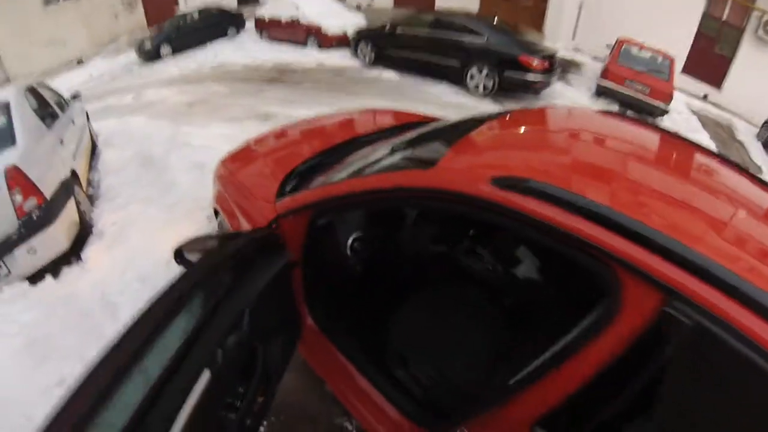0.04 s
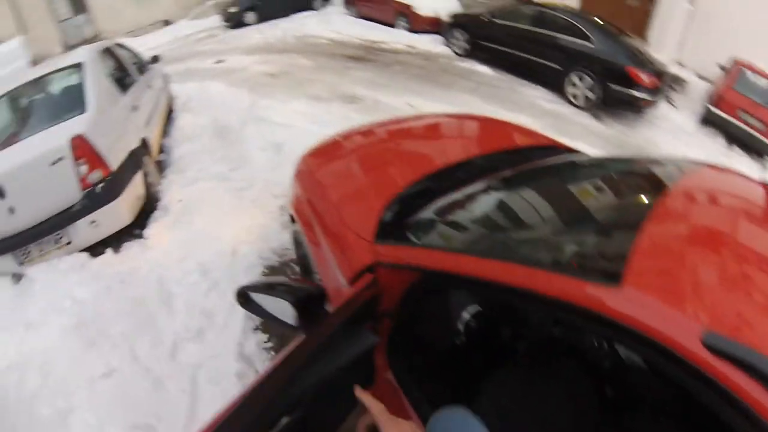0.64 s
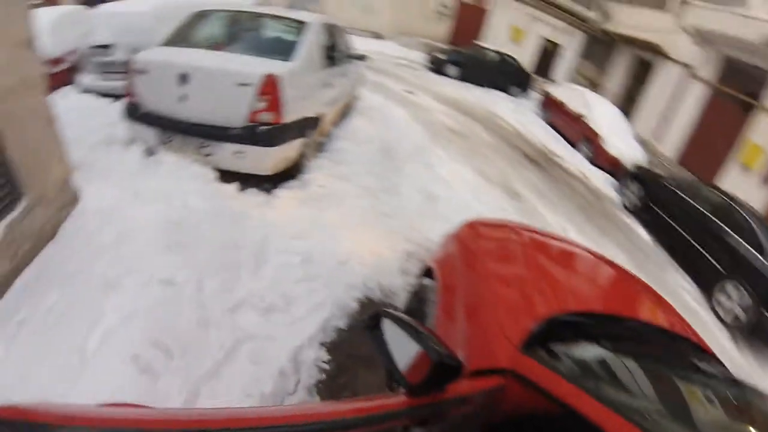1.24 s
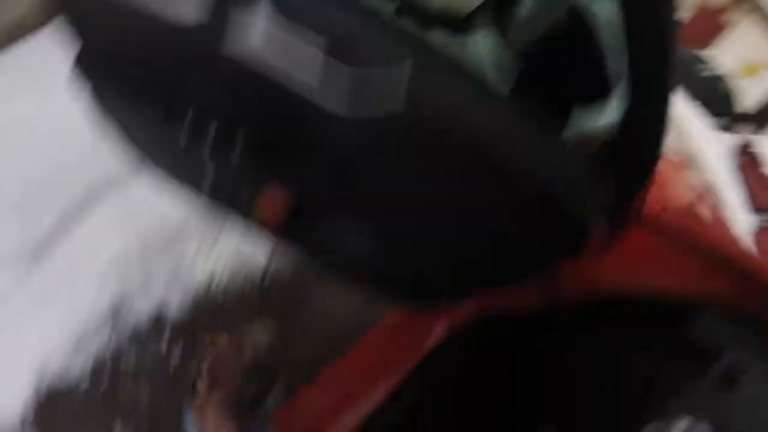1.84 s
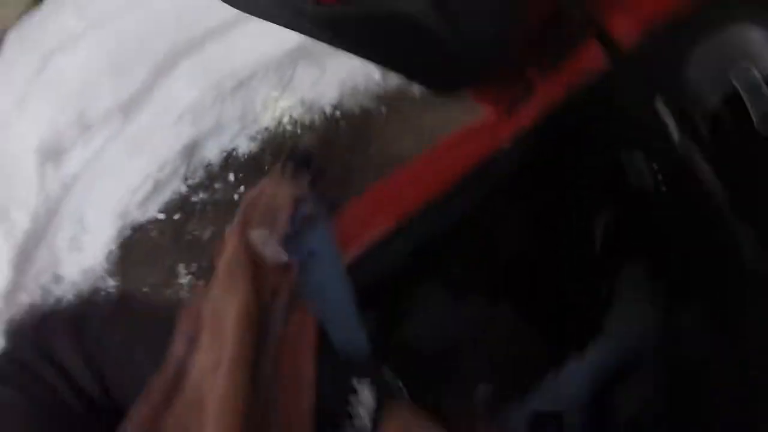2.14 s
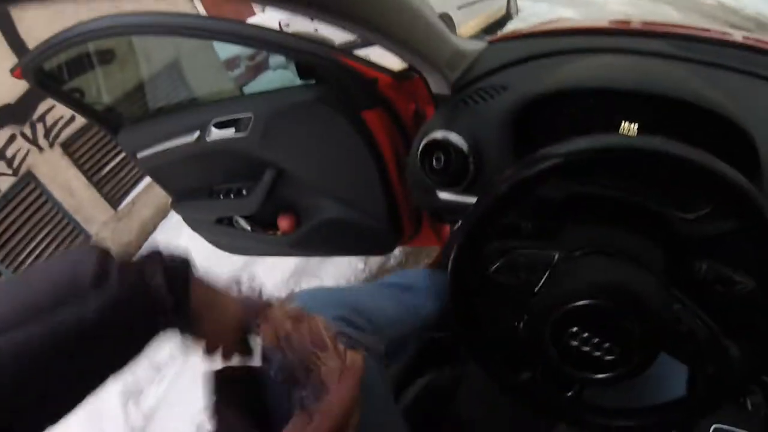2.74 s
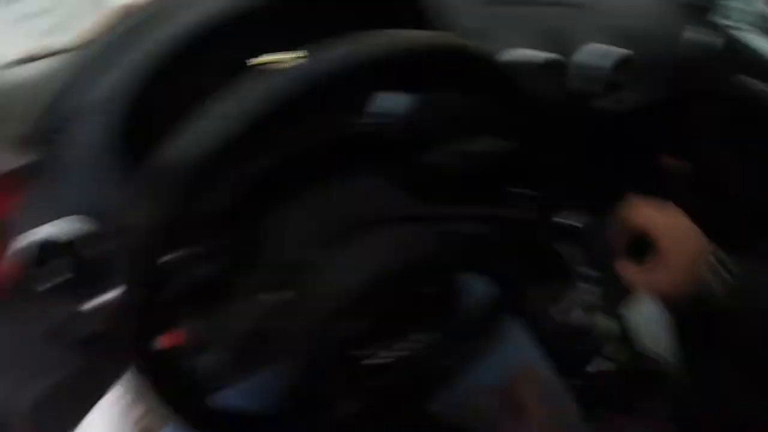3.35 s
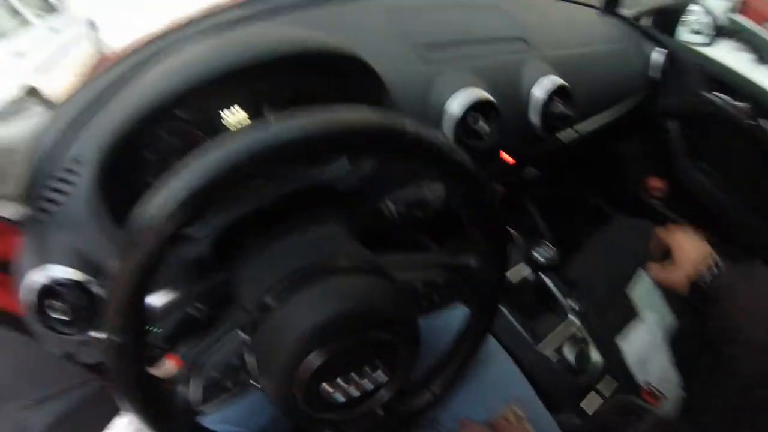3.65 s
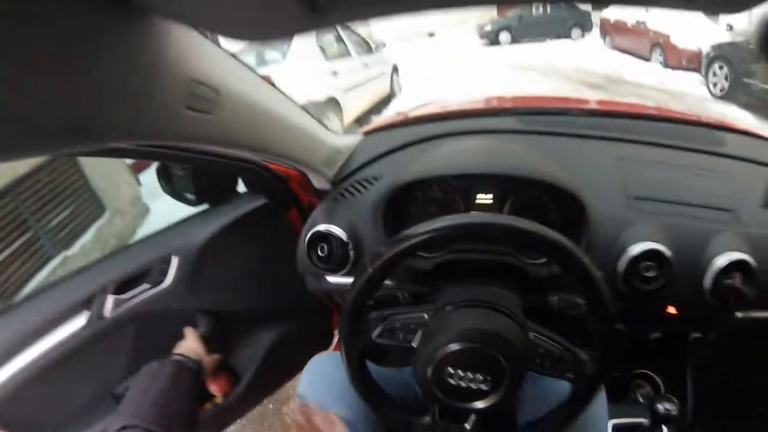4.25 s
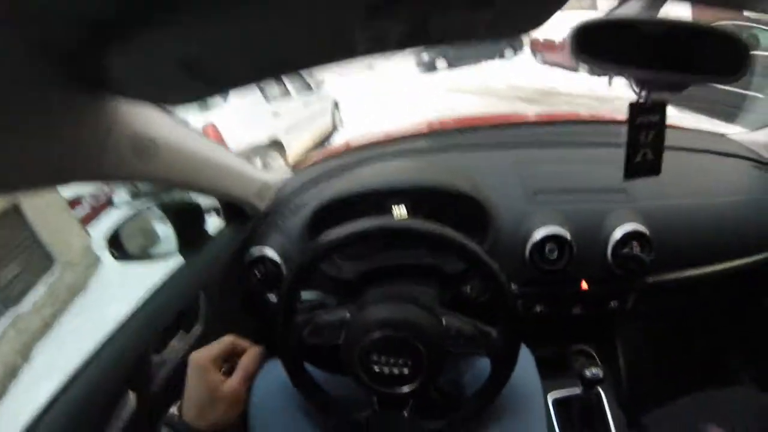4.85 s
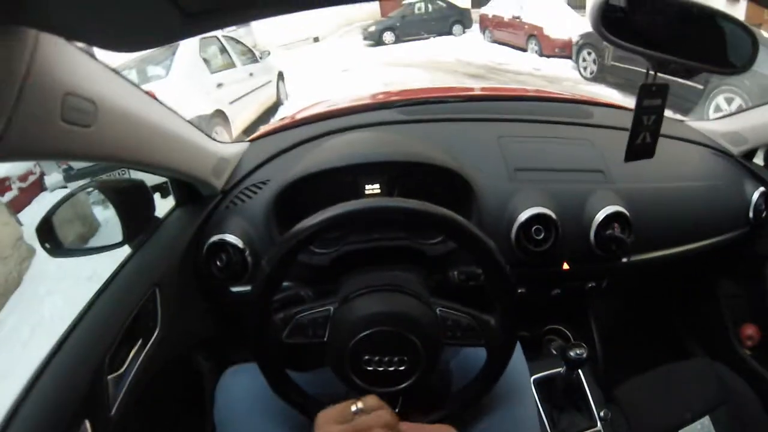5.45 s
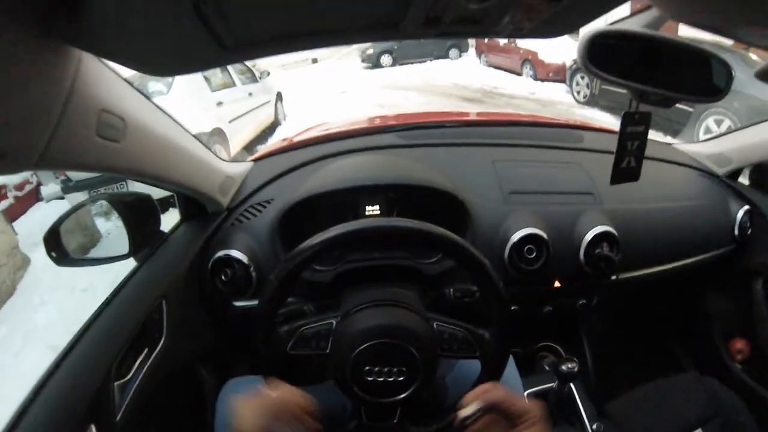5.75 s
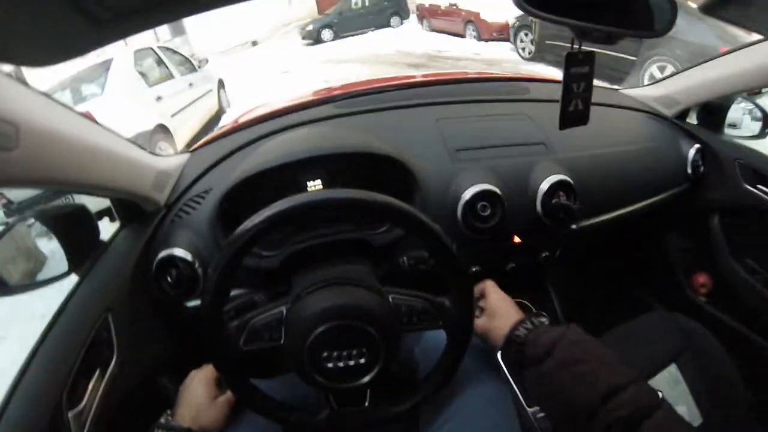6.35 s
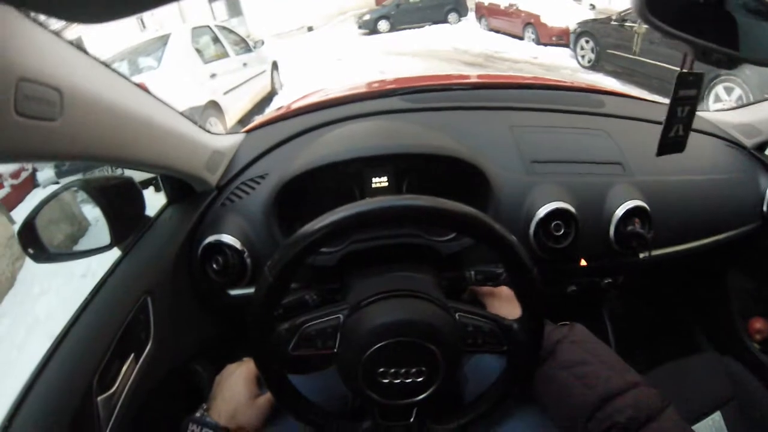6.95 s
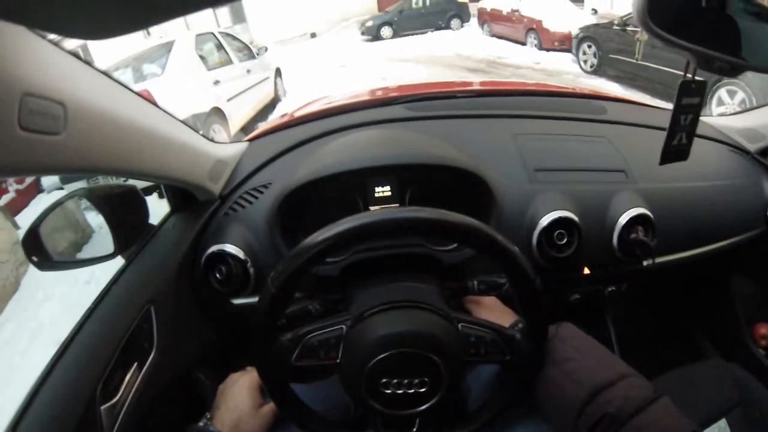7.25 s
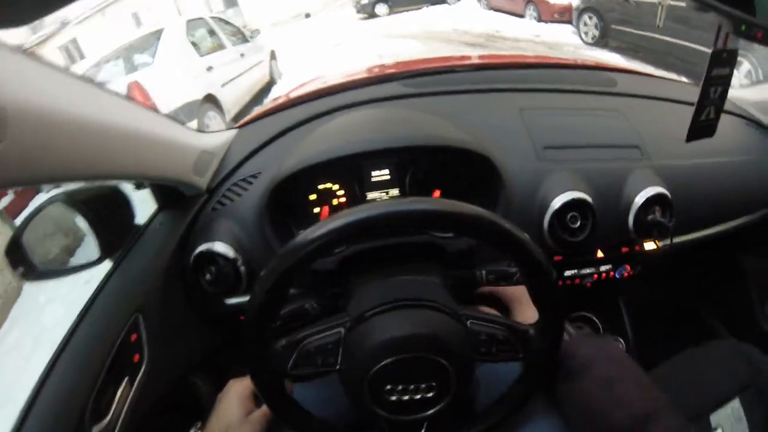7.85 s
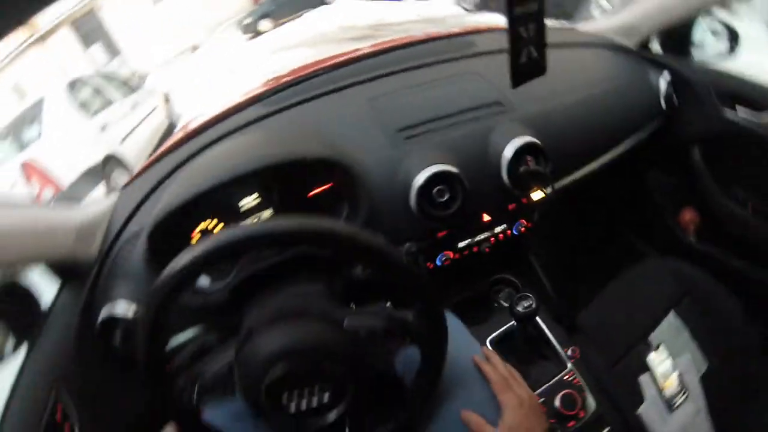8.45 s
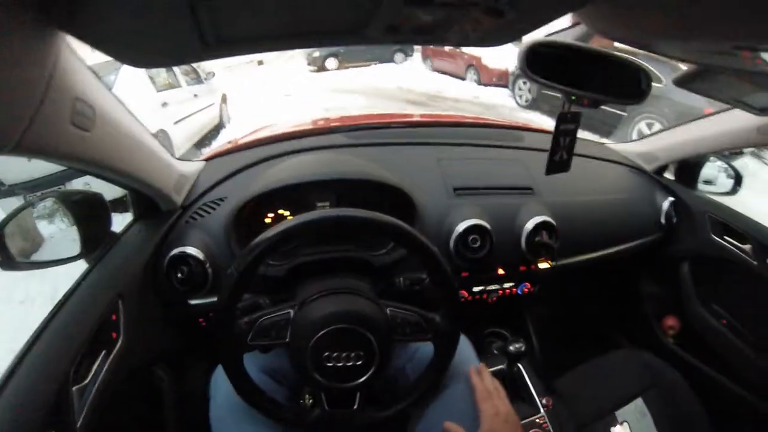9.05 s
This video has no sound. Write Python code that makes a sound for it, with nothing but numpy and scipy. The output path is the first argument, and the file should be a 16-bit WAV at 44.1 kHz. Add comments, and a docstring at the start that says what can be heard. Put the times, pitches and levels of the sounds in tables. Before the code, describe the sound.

A jacket rustles as someone climbs into a car, the door thumps shut, and a key clicks over low air rumble.

```python
"""Air rumbles on a head-worn microphone over faint hiss and the drone of a far machine in the street.
Close by, a driver in a padded jacket climbs into a parked car: cloth drags over the seat, ribbed folds
swish and squeak against each other, and small hard parts click. The door is pulled shut, its latch
snapping over the boom of panel and trapped air, and the drone is gone. In the small padded cabin
the key clicks into the ignition and turns through two notches."""
import sys
import numpy as np
from scipy import signal
from scipy.fft import rfft, irfft, next_fast_len
from scipy.io import wavfile
from scipy.ndimage import uniform_filter1d

SR = 44100
rng = np.random.default_rng(int(sys.argv[2]) if len(sys.argv) > 2 else 0)


def wav_out(sig):
    """Save sig, one row per channel (or a flat mono array), as 16-bit PCM at SR to the path in sys.argv[1]."""
    wavfile.write(sys.argv[1], SR, np.round(np.clip(np.atleast_2d(sig).T, -1, 1) * 32767).astype(np.int16))


N = 401751
TIME = np.arange(N) / SR
BAND_LIMIT_HZ = 15300


def amp(db):
    """Decibels to gain."""
    return 10 ** (np.asarray(db) / 20)


def unit_rms(x):
    """Scales to an rms of one."""
    return x / np.sqrt(np.mean(x ** 2) + 1e-20)


def at_hz(points, hz):
    """Reads a spectrum along a logarithmic frequency axis."""
    f, value = np.transpose(points)
    return np.interp(np.log(hz + 1), np.log(f + 1), value)


def fader(curve):
    """Turns rows of seconds and dB into a gain for every sample."""
    return amp(np.interp(TIME, *np.transpose(curve)))


def add(mix, start_s, sound):
    """Mixes a sound in at a given time."""
    part = mix[round(start_s * SR):][:len(sound)]
    part += sound[:len(part)]


def noise(shape, size=N):
    """Noise of rms one whose spectrum is a function of frequency."""
    length = next_fast_len(size)
    hz = np.fft.rfftfreq(length, 1 / SR)
    spectrum = rfft(rng.standard_normal(length)) * shape(hz)
    return unit_rms(irfft(spectrum, length)[:size])


def coloured(points):
    """Noise with a tabled spectrum."""
    return noise(lambda hz: amp(at_hz(points, hz)))


def wobble(rate_hz, size=N):
    """Random drift up to a given rate."""
    return noise(lambda hz: 1 / (1 + (hz / rate_hz) ** 4), size)


def impact(db, centre_hz, t60, octaves, damping, rise_s, top_hz):
    """A blow rings a dense cluster of modes around its centre; the high ones die first."""
    def hump(f):
        return 1 / (1 + (np.log2((f + 1) / centre_hz) / octaves) ** 2) / np.sqrt(1 + (f / top_hz) ** 5)

    t = np.arange(SR // 4) / SR
    hz = np.fft.rfftfreq(len(t), 1 / SR)
    cluster = rfft(noise(hump, len(t)))
    band_hz = np.geomspace(125, 16000, num=8)[:, None]
    shares = np.maximum(1 - abs(np.log2((hz + 1) / band_hz)), 0)
    band_t60 = t60 * (centre_hz / band_hz) ** damping
    bands = irfft(cluster * shares, len(t)) * amp(-60 * t / band_t60)
    return amp(db) * bands.sum(0) * (1 - np.exp(-t / rise_s))


def ring(modes, rise_s):
    """Dying modes, neighbours swinging in opposite directions; a soft contact swells slowly."""
    t = np.arange(SR) / SR
    swing = sum((-1) ** k * amp(db - 60 * t / t60) * np.sin(2 * np.pi * hz * t)
                for k, (hz, db, t60) in enumerate(modes))
    return swing * (1 - np.exp(-t / rise_s))


# Air right on the microphone. Each row: time in seconds, level in dB between 40 and 120 Hz.
AIR_LEVEL = [(0, -60), (.11, -57.5), (.18, -46), (.43, -52.5), (.64, -58), (1.07, -56.5), (1.15, -43),
             (1.5, -53), (1.72, -47), (2.13, -43.5), (2.24, -51), (3.02, -56), (3.76, -52), (4.55, -58),
             (4.8, -54.5), (5.1, -62), (5.6, -60), (6.0, -62.5), (7.3, -58.5), (7.65, -62.5), (7.88, -56.5),
             (8.37, -51), (8.6, -58), (9.11, -62.5)]
# Its eddies, before the treble rolls off. Each row: frequency in Hz, relative level in dB.
EDDY_SPECTRUM = [(5.9, -38), (10, 3), (22, -0.5), (34, -1.5), (58, -12.5), (102, -34.5), (300, -32),
                 (390, -64), (660, -120)]
def air_rumble(top_hz=150, gust_db=1.25, gust_hz=7):
    """Slow eddies push on the microphone, following the movement of the head."""
    eddies = noise(lambda hz: amp(at_hz(EDDY_SPECTRUM, hz)) / (1 + (hz / top_hz) ** 4))
    bass = signal.sosfiltfilt(signal.butter(4, [40, 120], "bandpass", fs=SR, output="sos"), eddies)
    bass_rms = np.sqrt(uniform_filter1d(bass ** 2, size=7000))
    return amp(gust_db * wobble(gust_hz)) * fader(AIR_LEVEL) * eddies / bass_rms


# The hiss behind everything. Each row: frequency in Hz, relative level in dB.
HISS_SPECTRUM = [(60, 7), (150, 3), (300, -3), (550, -6.5), (900, -9.5), (1600, -13), (2400, -14),
                 (3200, -10), (4400, -16), (6800, -16), (10300, -19), (11100, -15), (11800, -19),
                 (15000, -21.5)]
# Its stereo image. Each row: frequency in Hz, likeness of left and right from 0 to 1.
HISS_LIKENESS = [(60, 1.0), (150, 1.0), (380, 0.98), (940, 0.91), (2360, 0.91), (5920, 0.62), (14800, 0.69)]
def hiss(mid_db=-64.5):
    """Steady hiss, centred in the bass and parting between the ears in the treble."""
    likeness = np.clip(at_hz(HISS_LIKENESS, np.fft.rfftfreq(N, 1 / SR)), 0, 1)
    width = np.sqrt((1 - likeness) / (1 + likeness))
    side = irfft(rfft(coloured(HISS_SPECTRUM)) * width, N)
    return amp(mid_db) * (coloured(HISS_SPECTRUM) + np.array([side, -side]))


# A machine far off in the street. Each row: time in seconds, level in dB.
DRONE_LEVEL = [(0, -76.5), (1.2, -77.5), (2.2, -77), (2.9, -80), (4.7, -86), (4.9, -100)]
def street_drone(centre_hz=1590, half_width_hz=75):
    """A machine drones in one narrow band until the door shuts it out."""
    return fader(DRONE_LEVEL) * noise(lambda hz: 1 / (1 + ((hz - centre_hz) / half_width_hz) ** 2))


# The body shifts on the seat, below the microphone. Each row: time in seconds, relative level in dB.
RUSTLE_LEVEL = [(0, -70), (1.05, -72), (1.15, -69), (1.7, -68.5), (2.0, -66.5), (2.7, -67), (2.9, -69.5),
                (3.35, -66.5), (3.7, -73), (5.7, -71.5), (5.88, -67), (6.1, -73.5), (7.95, -73.5),
                (8.2, -65), (8.4, -69.5), (9.11, -72.5)]
# The colour of that rustle. Each row: frequency in Hz, relative level in dB.
RUSTLE_SPECTRUM = [(100, -15), (300, 0), (800, 0.5), (1500, -4.5), (2500, -5), (4000, -11), (7000, -16),
                   (15000, -25)]
def seat_rustle(gain_db=-3, clump_db=2, grain_db=2):
    """Cloth drags over upholstery in clumps of tiny catches."""
    catches = amp(gain_db + clump_db * wobble(19) + grain_db * wobble(400))
    return catches * fader(RUSTLE_LEVEL) * coloured(RUSTLE_SPECTRUM)


# The jacket, close under the microphone. Each row: start in seconds, length in seconds, relative level
# in dB, swell in dB, pitch midway in Hz, glide in octaves, sag in octaves, roughness from 0 to 1,
# brightness in dB per octave.
JACKET_STROKES = [ (1.168, 0.031, -59.5, 0, 2090, 0, 0, .85, 0.5),
                  (1.315, 0.14, -60, -3, 2347, -0.25, 0.15, 0.7, -3),
                  (1.445, .13, -59.5, -1, 2263, -0.12, 0.029, 0.96, 1.5),
                  (1.474, 0.03, -59, 0, 2270, .15, -0.04, 0.32, 2),
                  (1.563, 0.059, -53, 8, 1554, -0.53, 0.14, 0.79, 1.5),
                  (1.759, .05, -53, 16, 1380, 0.83, 0.027, 0.44, 4.5),
                  (1.785, 0.047, -47, 7, 2460, 0.049, 0.025, 0.47, -2),
                  (2.559, 0.024, -59.5, -7, 2060, -.25, 0, 0.27, -15),
                  (2.578, 0.087, -66, -7, 1235, 0.22, 0, 0.4, -20),
                  (2.807, 0.043, -61.5, -7, 1538, 0.073, 0, 0.82, 0),
                  (3.192, 0.027, -47.5, -7, 1830, -.1, -0.048, 0.45, -13),
                  (3.218, 0.055, -60, -7, 1950, 0, -0.0072, 0.57, -14),
                  (3.271, 0.097, -57, 11, 1840, .2, 0, 0.7, -11),
                  (3.387, 0.025, -59.5, 2, 2000, 0.074, -0.033, 0.65, -4),
                  (3.638, 0.059, -55, 7, 1733, 0.33, 0.37, 0.71, -5),
                  (4.027, 0.077, -50.5, 6.5, 1680, 0.017, 0.041, 0.7, -8),
                  (4.125, 0.041, -48.5, 2.5, 1620, 0.34, 0, 0.58, -3.5),
                  (4.156, 0.029, -44.5, -3, 1534, .3, 0.08, 0.24, 0),
                  (4.181, 0.042, -46.5, -1, 1680, .15, 0.23, 0.25, -2),
                  (4.213, 0.033, -48.5, -7, 2496, .4, 0.17, 0.15, -3),
                  (4.236, 0.047, -62, 2, 5030, .1, 0.034, 0.36, -1),
                  (4.269, .032, -59, 4, 5900, -.1, -0.36, 0.06, -6),
                  (4.295, .05, -53, -9, 1760, -0.92, 0.32, 0.38, 3.5),
                  (4.314, .046, -53, 4.5, 2400, 0.34, .15, 0.5, -4),
                  (5.119, 0.072, -67, -2, 2000, 0, 0.1, .95, -11),
                  (7.949, .038, -60.5, 4, 2020, -0.026, -0.18, .68, -2),
                  (7.988, .052, -54, 10, 2000, -.65, .25, .3, 1.5),
                  (8.034, 0.3, -65, -6, 1995, 0.056, 0, 0.97, -4),
                  (8.855, 0.041, -62.5, 4, 2040, 0.75, 0.081, 0.3, 3),
                  (8.933, .052, -55.5, 2, 1947, .15, .65, 0.48, 0.5)]
# The swish of its cloth. Each row: frequency in Hz, relative level in dB.
SWISH_SPECTRUM = [(200, -21.5), (900, -4.5), (1400, -4.5), (2400, -7), (4000, -6.5), (5600, -6.5),
                  (7200, -12), (11500, -21.5), (15000, -25)]
def jacket_stroke(length, db, swell_db, mid_hz, glide, sag, rough, brightness_db):
    """Ribs tick past each other at a pitch set by sliding speed; loose folds smear it into a swish."""
    grip_s, release_s, gain_db, press_db_per_octave = 0.009, 0.012, -4, 18
    waver_octaves, waver_hz, jitter = 0.061, 79.7, 0.115
    overtone_db_per_octave, second_ratio, second_db, catch_db = -8, 1.37, -2, 2
    t = np.arange(0, length, 1 / SR)
    size = len(t)
    along = t / length - 0.5
    slack = sag * (2 * along) ** 2  # folds pressed harder squeak lower and louder
    hz = mid_hz * 2 ** (glide * along + slack + waver_octaves * wobble(waver_hz, size))
    contact = np.minimum(t / grip_s, 1) * np.minimum((length - t) / release_s, 1)
    envelope = contact * amp(db + gain_db + swell_db * along - press_db_per_octave * slack)

    def fold(rib_hz):
        turns = np.cumsum(rib_hz * (1 + jitter * rough * wobble(575, size))) / SR
        tilt = overtone_db_per_octave + brightness_db
        harmonics = (amp(tilt * np.log2(k)) * (k * rib_hz < BAND_LIMIT_HZ) * np.sin(2 * np.pi * k * turns)
                     for k in range(1, 5))
        return unit_rms(sum(harmonics))

    # a second fold slides at its own wandering speed
    second = fold(hz * second_ratio * (1 + 0.1 * wobble(40.4, size)))
    ribs = fold(hz) + amp(second_db) * rough * second
    swish = noise(lambda f: amp(at_hz(SWISH_SPECTRUM, f) + brightness_db * np.log2(1 + f / 2000)), size)
    catches = unit_rms(amp(catch_db * np.clip(wobble(200, size), -2, 2)))  # the cloth sticks and slips
    return envelope * (np.sqrt(1 - rough ** 2) * ribs + rough * swish) * catches


def tick(db, centre_hz, t60, gain_db=-1):
    """One hard little part of plastic or metal strikes another."""
    return impact(db + gain_db, centre_hz, t60, octaves=1.08, damping=0.57, rise_s=0.0005, top_hz=14600)


# Small parts within arm's reach. Each row: start in seconds, relative level in dB, centre in Hz,
# t60 in seconds.
SMALL_KNOCKS = [(1.21, -62.5, 1240, .08), (2.565, -51.5, 2100, 0.014), (3.146, -54.5, 2970, .066),
                (3.149, -50.5, 650, 0.085), (3.198, -40.5, 1500, 0.014), (3.227, -55.5, 7500, 0.026),
                (3.525, -59, 2500, 0.035), (5.451, -61, 7000, 0.037), (5.513, -57.5, 7000, .032),
                (5.75, -54.5, 9000, 0.056), (5.764, -55.5, 9000, 0.037), (6.275, -46.5, 3280, 0.063),
                (7.516, -56.5, 2460, 0.054), (7.553, -53, 3000, 0.079), (8.739, -56, 2820, 0.063)]
def small_clicks():
    """Handle, zip and key ring knock and ring briefly."""
    out = np.zeros(N)
    for start, db, hz, t60 in SMALL_KNOCKS:
        add(out, start, tick(db, hz, t60))
    return out


# A thin whistle as the arm reaches for the door. Each row: time in seconds, pitch in Hz, level in dB.
WHISTLE_PATH = [(2.88, 2570, -81), (2.94, 2550, -60), (3.0, 2580, -73), (3.05, 2560, -65), (3.1, 2520, -79),
                (3.15, 2570, -66), (3.2, 2580, -74)]
def whistle(waver=0.0064):
    """One faint, slightly unsteady tone."""
    times, hz, db = np.transpose(WHISTLE_PATH)
    turns = np.cumsum(np.interp(TIME, times, hz) * (1 + waver * wobble(60))) / SR
    rms = amp(np.interp(TIME, times, db, left=-140, right=-140))
    return np.sqrt(2) * rms * np.sin(2 * np.pi * turns)


# The door from the driver's seat: it meets its seal, the latch snaps, the panel flexes and settles.
# Each row: start in seconds, level in dB, centre in Hz, t60 in seconds.
DOOR_BLOWS = [(4.8187, -32.5, 330, 0.072), (4.8233, -40, 1300, 0.061), (4.832, -26.5, 400, 0.062),
              (4.8335, -22, 3900, 0.017), (4.844, -40, 1500, 0.064), (4.85, -32.5, 165, 0.23),
              (4.878, -40, 1700, 0.097), (4.931, -53, 597, .12), (4.966, -63.5, 1210, 0.13)]
# The door and the air it traps in the cabin. Each row: frequency in Hz, level in dB, t60 in seconds.
BOOM_MODES = [(22.85, -12.5, 0.26), (61.5, -36, 0.62), (90.5, -27, 0.32), (121, -33, 0.38),
              (172.7, -30, .29), (233, -41.5, 0.327), (283, -46, 0.3), (346, -42.5, 0.31),
              (401, -45.5, 0.32), (437, -51, 0.35), (543, -39, 0.11)]
# The steel of the latch. Each row: frequency in Hz, level in dB, t60 in seconds.
LATCH_MODES = [(1550, -42, .08), (2550, -36, 0.036), (3030, -29, 0.019), (3294, -36, 0.045),
               (3660, -30, 0.018), (4880, -28, 0.017), (6470, -37, 0.028)]
def door(shut_s=4.831, latch_s=4.8335):
    """A quick run of blows from seal, latch and lock, over the boom of the panel and trapped air."""
    # the lock chatters after the latch, each bounce weaker than the last
    chatter_s, gap_s, first_db, fall_db, lock_hz, lock_t60 = 4.857, 0.0113, -33.5, 4, 2100, 0.062
    chatter = [(chatter_s + k * gap_s, first_db - k * fall_db, lock_hz, lock_t60) for k in range(4)]
    out = np.zeros(N)
    for start, db, hz, t60 in DOOR_BLOWS + chatter:
        add(out, start, impact(db, hz, t60, octaves=1.16, damping=0.42, rise_s=0.0011, top_hz=6240))
    add(out, shut_s, ring(BOOM_MODES, rise_s=0.009))
    add(out, latch_s, ring(LATCH_MODES, rise_s=0.00047))
    return out


# The key, an arm's length away, goes in, seats and turns two notches. Each row: start in seconds,
# barrel gain in dB, brightness in dB per octave, relative tick level in dB, tick centre in Hz.
KEY_MOVES = [(6.2704, -8.5, 7, -43.5, 4480), (6.698, -22.5, -12, -55, 3000), (7.536, -4.5, 3, -50, 9000),
             (7.5786, -0.5, -2, -43.5, 4500)]
# The ignition barrel. Each row: frequency in Hz, relative level in dB, t60 in seconds.
BARREL_MODES = [(530, -52.5, 0.026), (1190, -45.5, 0.03), (1510, -49.5, 0.024), (3050, -48.5, 0.024),
                (3370, -57, 0.036), (5240, -51, .033)]
def ignition_key():
    """Each move of the key ticks and rings the barrel."""
    out = np.zeros(N)
    for start, barrel_db, brightness_db, tick_db, tick_hz in KEY_MOVES:
        modes = [(hz, db + barrel_db + brightness_db * np.log2(hz / 2000), t60)
                 for hz, db, t60 in BARREL_MODES]
        add(out, start, ring(modes, rise_s=0.00025))
        add(out, start, tick(tick_db, tick_hz, t60=0.035))
    return out


# Inside the car, narrow peaks, a broad hollow in the mids and a slight treble dip colour the close
# sounds. Each row: centre in Hz, width in Hz, gain in dB.
CABIN_RESONANCES = [(840, 570, -4.5), (1460, 84, 5), (1597, 108, 6.5), (2083, 220, 5), (2483, 59, 5.5),
                    (3360, 260, 6.5), (4400, 320, -1.5), (5120, 205, 7), (6930, 190, 5), (11140, 470, 5)]
def cabin(x, wet_db=-10, t60=0.061, low_cut_hz=400, delay_s=0.002):
    """Resonant peaks and dips, then the brief reflections of a small padded space."""
    for hz, width, db in CABIN_RESONANCES:
        x = x + (amp(db) - 1) * signal.lfilter(*signal.iirpeak(hz, hz / width, fs=SR), x)
    t = np.arange(SR // 5) / SR
    tail = noise(lambda hz: hz ** 2 / (hz ** 2 + low_cut_hz ** 2), len(t))
    tail *= amp(-60 * t / t60) * (t > delay_s)
    return x + amp(wet_db) * signal.oaconvolve(x, tail / np.linalg.norm(tail))[:N]


def scene():
    """From the driver's head, everything but the hiss is heard in the middle."""
    jacket = np.zeros(N)
    for start, *stroke in JACKET_STROKES:
        add(jacket, start, jacket_stroke(*stroke))
    inside = cabin(jacket + seat_rustle() + small_clicks() + ignition_key() + door())
    return inside + whistle() + air_rumble() + hiss() + street_drone()


def record(dry):
    """The head-worn camera cuts off the highest treble."""
    low_pass = signal.firwin(511, BAND_LIMIT_HZ, window=("kaiser", 9), fs=SR)
    return signal.oaconvolve(dry, low_pass[None], "same")


dry = scene()
out = record(dry)
wav_out(out)
```